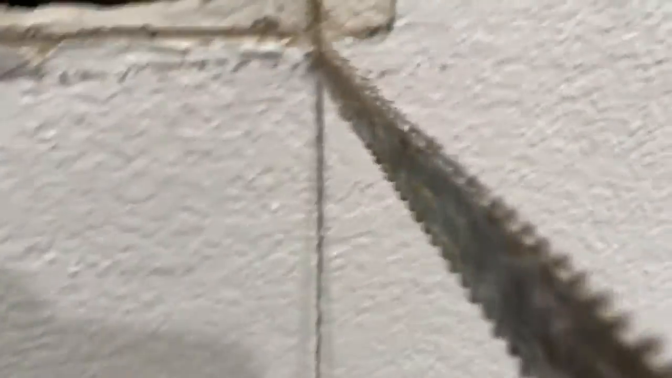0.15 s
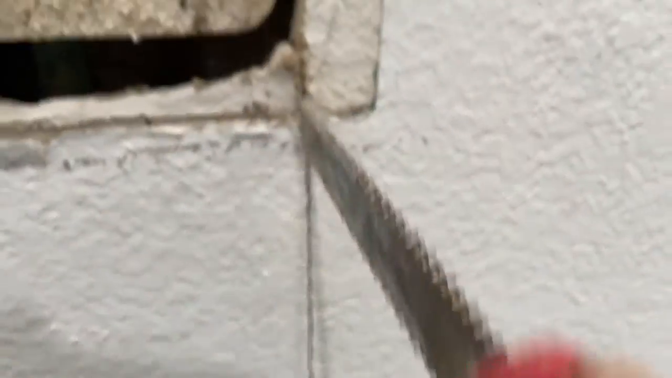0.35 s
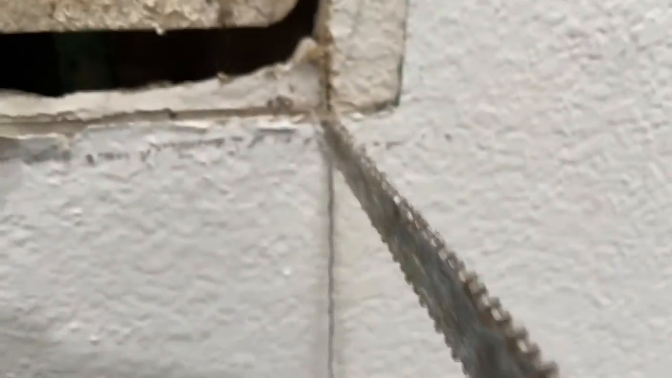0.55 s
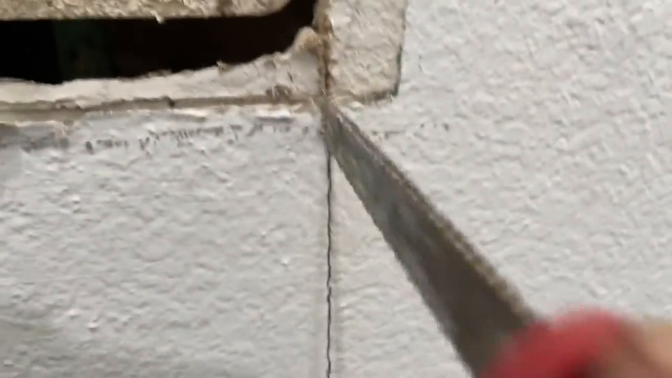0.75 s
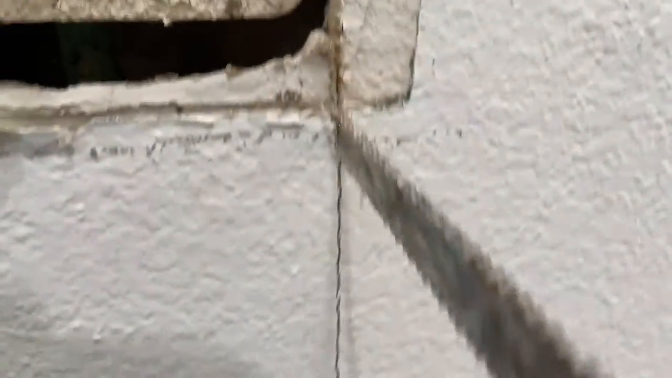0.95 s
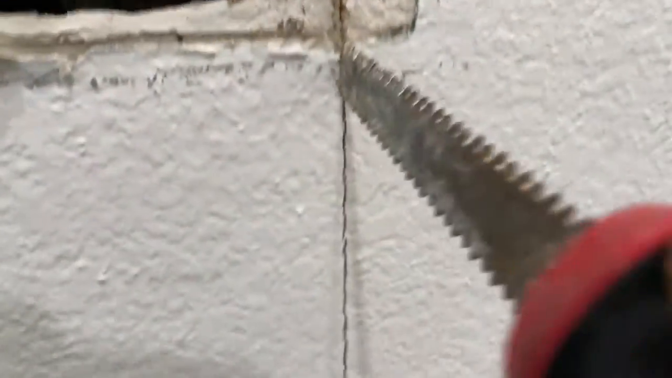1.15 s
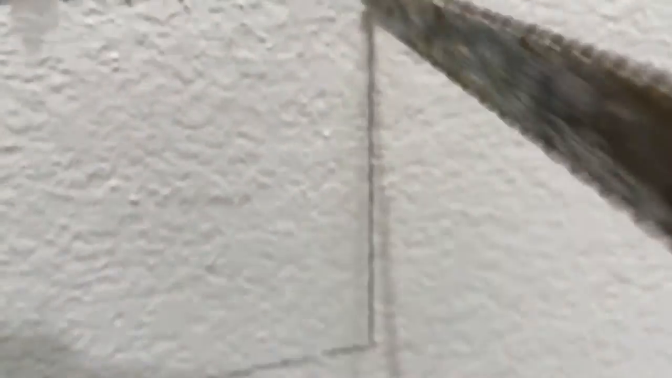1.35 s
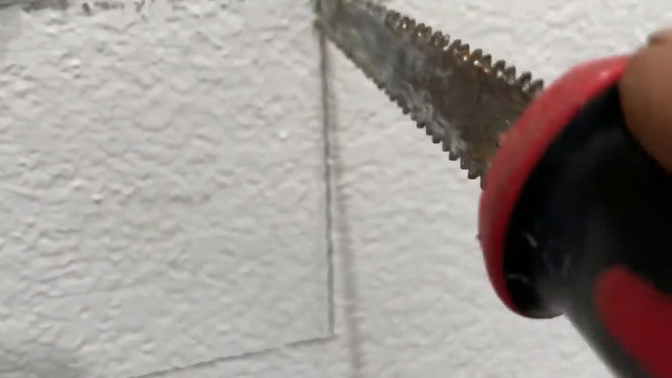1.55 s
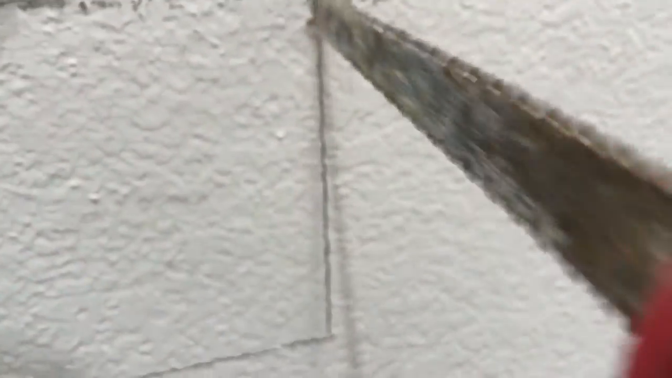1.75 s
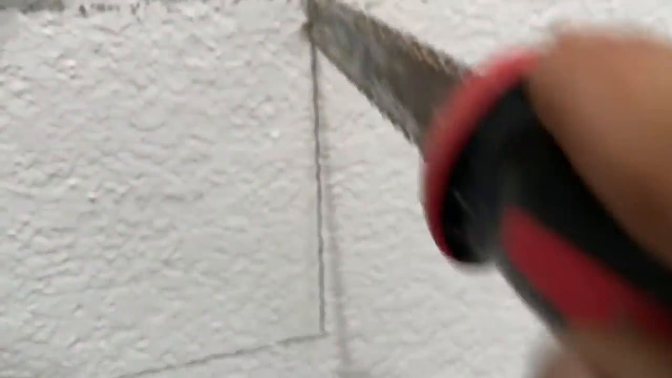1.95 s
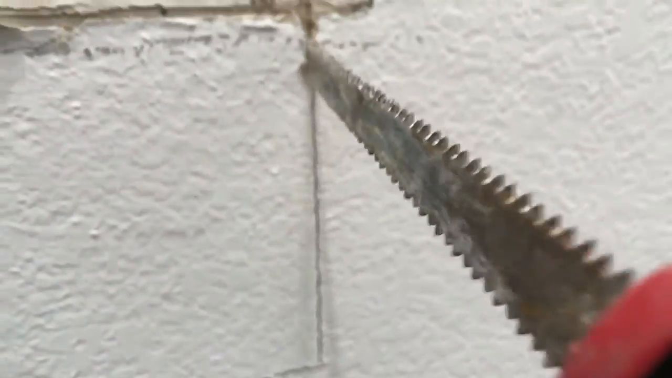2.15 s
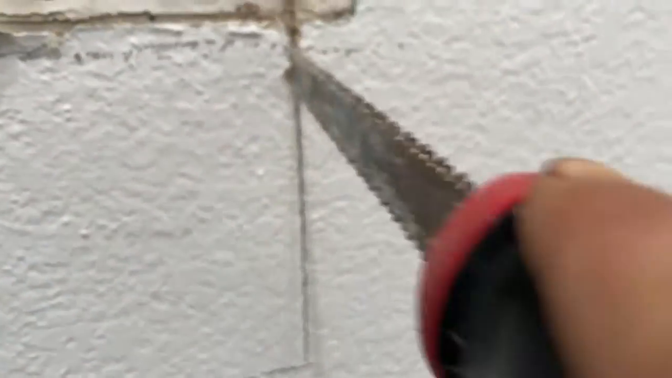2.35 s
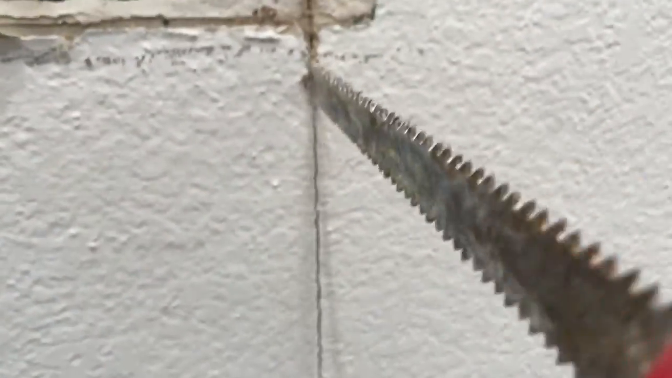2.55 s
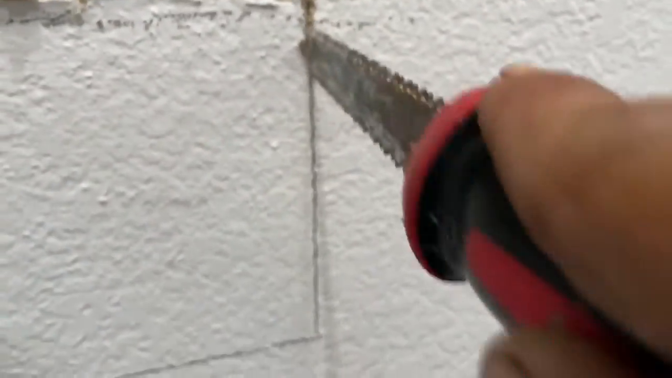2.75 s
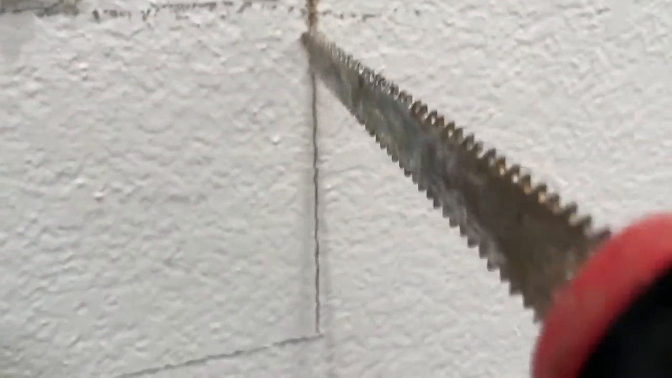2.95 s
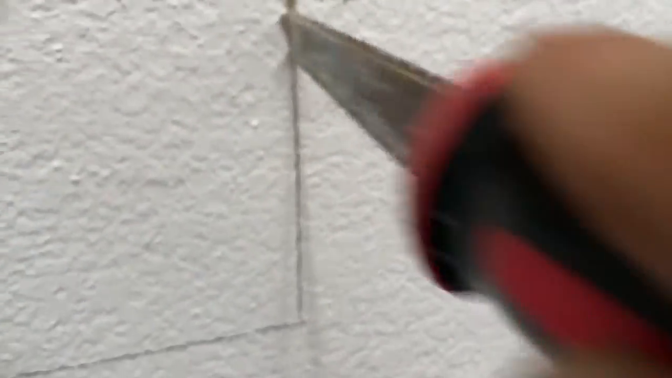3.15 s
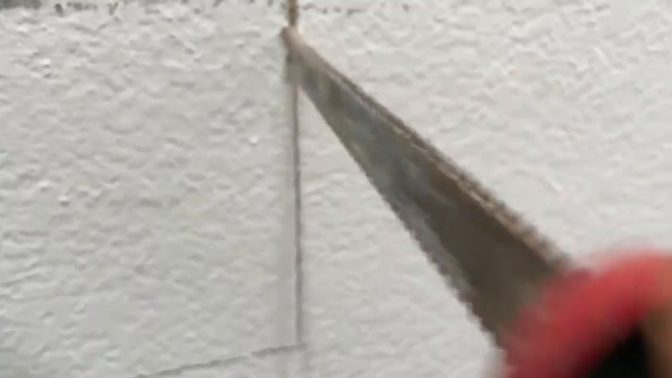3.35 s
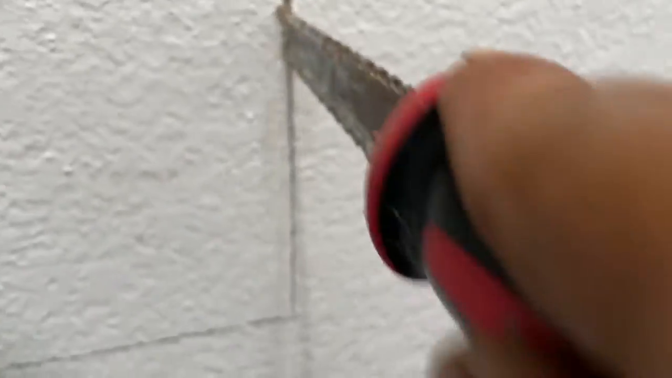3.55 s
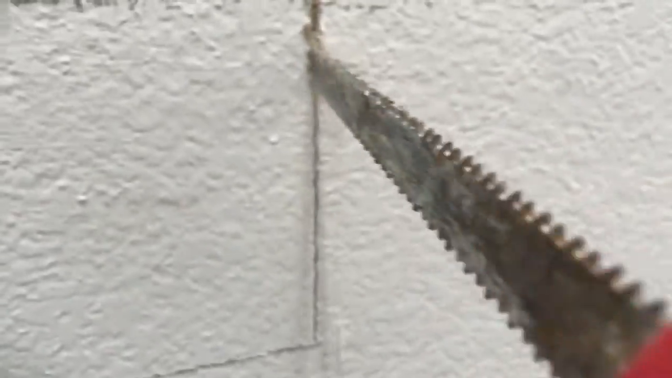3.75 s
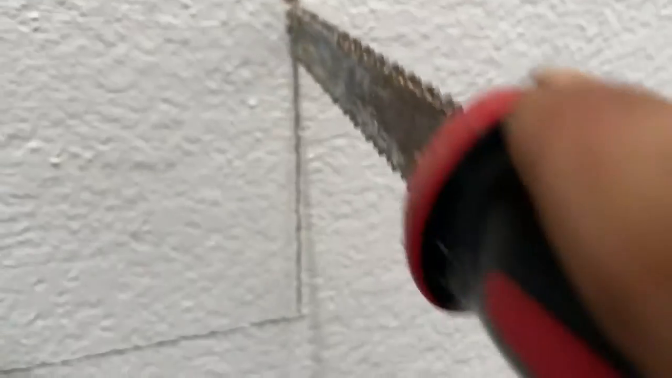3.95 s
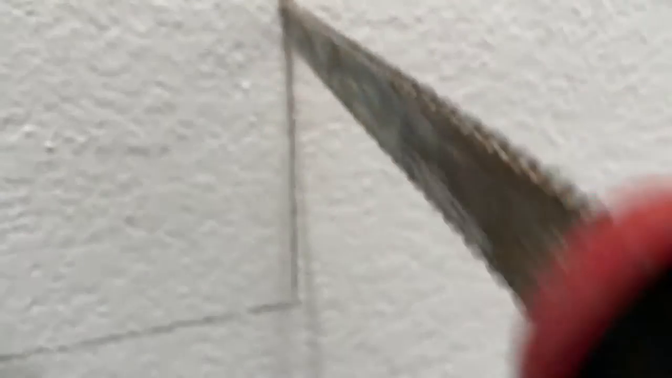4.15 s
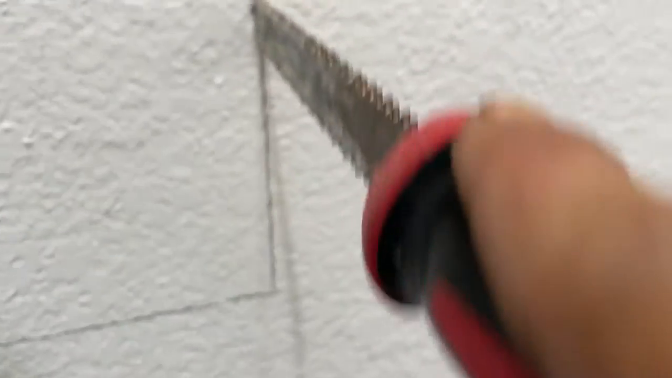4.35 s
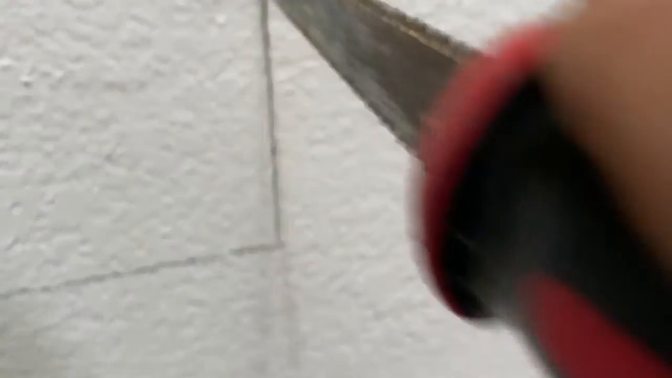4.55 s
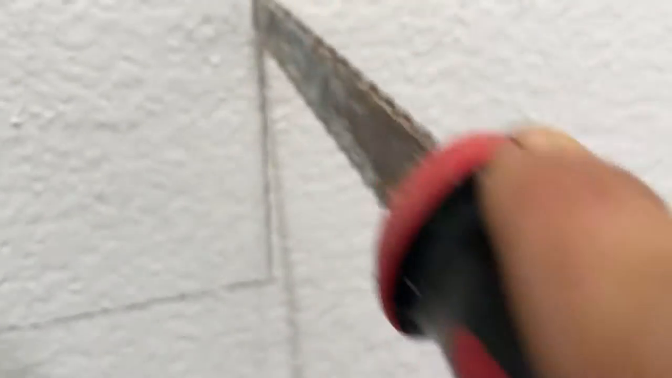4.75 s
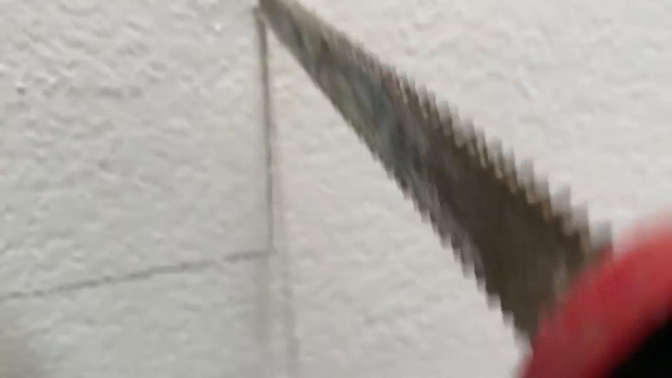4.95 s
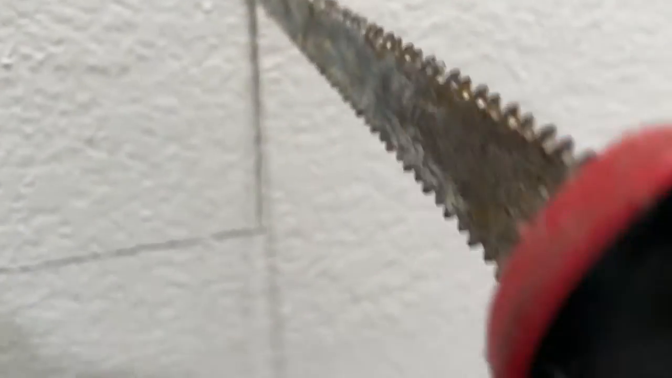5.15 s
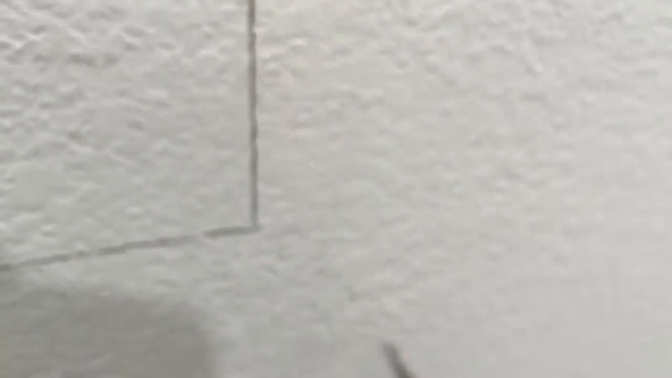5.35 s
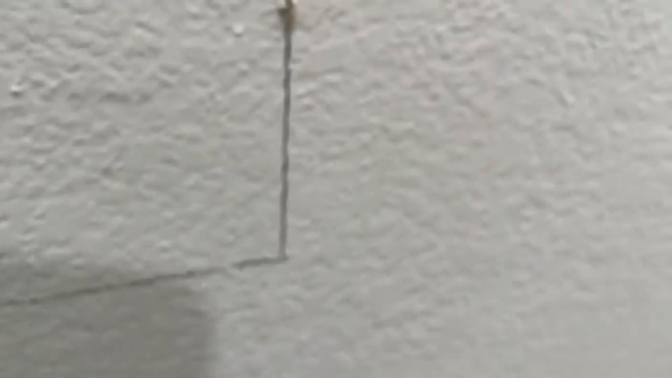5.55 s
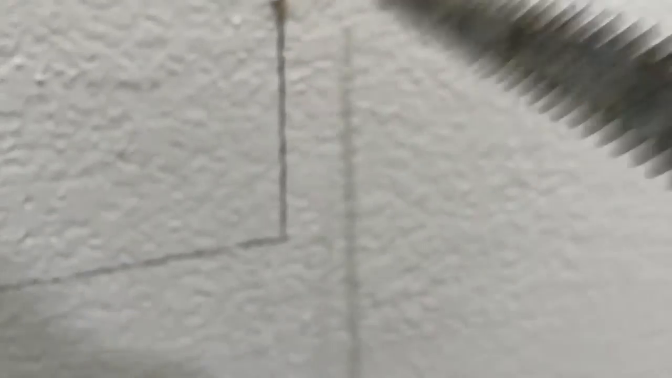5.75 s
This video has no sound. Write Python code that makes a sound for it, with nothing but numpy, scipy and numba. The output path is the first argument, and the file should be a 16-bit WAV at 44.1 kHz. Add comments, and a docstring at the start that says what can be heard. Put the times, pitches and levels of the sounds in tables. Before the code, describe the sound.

Close, fast sawing in a hollow wall panel: gritty rasps over a drumming low boom, ending in a short metallic ring and a hard thump.

```python
"""Hand saw in plasterboard

A narrow hand saw works back and forth through a hollow plasterboard wall, close to a phone, indoors.
Stick-slip chatter drives a low boom, random tooth bites ring board modes, filtered noise makes grit and dust.
Chips snap as noise bursts; the drawn-out blade rings briefly and knocks the wall as falling thumps and slaps.
Behind it lie filtered-noise room rumble, wavering hum partials and a momentary thin whine."""
import sys
import numpy as np
from scipy import signal
from scipy.fft import rfft, irfft
from scipy.io import wavfile
from scipy.ndimage import uniform_filter1d
from numba import njit

SR = 44100
rng = np.random.default_rng(int(sys.argv[2]) if len(sys.argv) > 2 else 0)


def generate_wav(sig):
    """Save sig (samples, or channels by samples) to the path in sys.argv[1] as 16-bit PCM at SR."""
    pcm = np.round(np.clip(np.atleast_2d(sig).T, -1, 1) * 32767).astype(np.int16)
    wavfile.write(sys.argv[1], SR, pcm)


N = 255780

# saw strokes, lags relative to the fastest moment: fastest_s, rise_s, fall_s, grit_gain_db, dust_gain_db,
# boom_gain_db, boom_lag_s, drum_gain_db, drum_lag_s, rasp_gain_db, rasp_lag_s,
# chatter_rising_hz, chatter_full_speed_hz, chatter_slowing_hz
STROKES = [(0.092, 0.046, 0.06, -47.5, -50.5, -27.5, 0.018, -46, -0.005, -32.5, -0.01, 104.5, 84, 80.5),
           (0.295, 0.1, 0.14, -27, -29.5, -12.5, 0.012, -19.5, -0.00075, -10.5, -0.0015, 91.9, 95, 95),
           (0.469, 0.137, 0.38, -40.5, -38.5, -18, 0.009, -25, -0.0012, -25.0, -0.016, 99.1, 86, 84.7),
           (0.569, 0.092, 0.077, -39.0, -42, -11.5, -0.022, -29.5, -0.007, -23.5, -0.014, 87, 82, 78),
           (0.727, 0.078, 0.16, -32.5, -32, -12.5, 0.027, -18.5, 0.012, -13, -0.0027, 99.15, 112, 93),
           (0.931, 0.13, 0.16, -37.0, -36.5, -10.5, 0.032, -27, 0.043, -19.5, 0.017, 79.9, 82, 72.5),
           (1.126, 0.11, 0.16, -32.5, -34.0, -10.0, -0.0049, -33, 0.01, -19.0, -0.011, 90.6, 84, 86),
           (1.328, 0.14, 0.2, -38.5, -36, -19, 0.0011, -16.5, 0.034, -21.5, 0.022, 85, 89, 93),
           (1.559, 0.18, 0.21, -39, -38.5, -17.5, 0.023, -32.0, 0.032, -24.0, 0.003, 86.16, 91, 105),
           (1.759, 0.099, 0.148, -37.5, -33.5, -13.0, 0.012, -23.5, 0.021, -20.5, -0.013, 91, 89, 85),
           (1.952, 0.14, 0.14, -33.5, -35.0, -13, 0.018, -25.0, 0.002, -12.5, -0.0033, 87.75, 104, 84.7),
           (2.115, 0.114, 0.2, -37, -34.0, -12.5, 0.01, -20, 0.021, -19, -0.007, 88.15, 97, 85),
           (2.267, 0.046, 0.075, -48.5, -53, -35.0, 0.041, -52.0, 0.027, -33, 0.003, 69, 77, 102),
           (2.351, 0.061, 0.062, -36, -37.5, -17.5, 0.028, -25, 0.0072, -20.5, -0.0074, 109.2, 87, 90),
           (2.435, 0.091, 0.075, -40.5, -45.5, -22.5, 0.028, -29.5, -0.011, -29, 0.0036, 107.8, 89, 85.6),
           (2.555, 0.11, 0.19, -39.5, -38.5, -14, 0.0033, -28.5, -0.001, -23, 0.0013, 98.95, 99, 85),
           (2.78, 0.12, 0.13, -30.5, -34.5, -11.5, 0.002, -23, 0.016, -14, -0.017, 92.96, 97.85, 102),
           (2.94, 0.11, 0.24, -36.5, -35.5, -12, 0.016, -28, 0.032, -19.5, 0.0035, 76.9, 87, 88.8),
           (3.188, 0.07, 0.17, -33, -36.5, -13, 0.026, -21, 0.005, -18.5, -0.0036, 85.9, 86, 93),
           (3.39, 0.16, 0.2598, -38.0, -37.5, -18, 0.033, -23, 0.011, -22, 0.006, 85, 91, 81.9),
           (3.58, 0.085, 0.15, -29, -31.5, -11, 0.0062, -16.5, 0.0025, -13, -0.006, 106.7, 103, 104),
           (3.758, 0.12, 0.188, -37, -33, -12, -0.0065, -18.0, 0.042, -16, 0.00013, 94.94, 88, 87),
           (3.93, 0.099, 0.14, -31, -32.5, -11.5, 0.0087, -17.5, 0.025, -12, 0.00095, 102, 107, 90),
           (4.115, 0.12, 0.19, -36.0, -33, -11, 0.015, -23, 0.015, -19.5, -0.0014, 93, 97.7, 92.2),
           (4.302, 0.11, 0.132, -31, -32.5, -9.5, 0.012, -30, -0.016, -14.5, -0.0018, 102.9, 116, 96),
           (4.499, 0.13, 0.14, -35.0, -32.5, -10.5, 0.008, -24, -0.0051, -14.5, 0.0047, 89, 105, 90.3),
           (4.684, 0.132, 0.14, -32, -33, -10.5, 0.018, -19.5, -0.00075, -16, -0.0037, 99, 104, 83),
           (4.921, 0.188, 0.17, -34.0, -33.5, -11.5, -0.0052, -26, -0.015, -19, -0.0051, 97, 103, 98),
           (5.343, 0.061, 0.084, -37.5, -34.0, -25, -0.018, -37.0, 0.038, -33, -0.0069, 105, 90, 83),
           (5.532, 0.012, 0.082, -48, -43.5, -27, -0.016, -35, -0.034, -26, -0.0064, 95, 93, 70)]
# upper board resonances: centre_hz, width_hz, gain_db
UPPER_MODES = [(880, 490, -13), (550, 370, -13), (731, 34, 2), (905.7, 28.3, 5), (1073, 13.5, -7),
               (1236, 14, -5), (1357, 6.5, -4.5), (1490, 13, -9.5), (2154, 10, -9.5), (2535, 23, -9.5),
               (3330, 9.3, -8.5)]


def undb(db):
    """Amplitude factor of a level in dB."""
    return 10 ** (np.asarray(db) / 20)


def unit(x):
    """Scale to an rms of 1."""
    return x / np.sqrt(np.mean(x ** 2))


def decay(t, t60_s):
    """Exponential fall by 60 dB in t60_s."""
    return np.exp(-np.log(1000) * t / t60_s)


def colour(x, points, turn_rad=0):
    """Filter by a (Hz, dB) outline; turn_rad is a phase shift per frequency bin."""
    hz, db = np.transpose(points)
    bins_hz = np.arange(N // 2 + 1) * SR / N + 1
    outline_db = np.interp(np.log(bins_hz), np.log(hz), db, -90, -90)
    return irfft(rfft(x) * undb(outline_db) * np.exp(1j * turn_rad), N)


@njit
def svf(x, hz, width_hz):
    """State-variable band-pass with a moving centre, gain 1 at the centre."""
    y, band, low = np.empty(len(x)), 0., 0.
    for i in range(len(x)):
        g, k = np.tan(np.pi * hz[i] / SR), width_hz / hz[i]
        v = (band + g * (x[i] - low)) / (1 + g * (g + k))
        band, low, y[i] = 2 * v - band, low + 2 * g * v, k * v
    return y


def walk(rate_hz):
    """Random levels held 1 / rate_hz s and slewed twice; spread 1."""
    hold = int(SR / rate_hz)
    steps = np.repeat(rng.standard_normal(N // hold + 1), hold)
    return unit(uniform_filter1d(uniform_filter1d(steps, hold), hold)[:N])


def resonate(x, modes, shift_db=0.):
    """Sum of resonances with alternating sign; each may swell and sink on its own."""
    out = np.zeros(N)
    for k, (hz, width_hz, db) in enumerate(modes):
        gain = undb(db + shift_db * walk(18))
        out += (-1) ** k * gain * svf(x, np.full(N, 1. * hz), 1. * width_hz)
    return out


def smooth_rms(x, span_s):
    """Running rms over span_s."""
    return np.sqrt(uniform_filter1d(x ** 2, int(span_s * SR)) + 1e-12)


def snaps(events, gain_db, fall_s):
    """Sudden rises that die away exponentially, with time constant fall_s."""
    out, t = np.zeros(N), np.arange(int(6 * fall_s * SR)) / SR
    for s, db in events:
        start = int(s * SR)
        out[start:start + len(t)] += undb(db + gain_db) * np.exp(-t / fall_s)
    return out


def room():
    """Quiet room rumble from filtered noise, and the wavering hum of an appliance from sines."""
    # rumble outline: hz, gain_db
    rumble_outline = [(24, -34), (40, -1), (122, -3.5), (284, -15), (478, -18), (1960, -29), (2390, -26.5),
                      (2580, -29), (8070, -41.5), (15000, -50)]
    # hum partials: pitch_hz, level_db (rms, before wavering), start_s, end_s
    hum_partials = [(59, -48, 0, 5.8), (118, -50, 0, 5.4), (937, -69, 0, 5.8), (1480, -67, 0, 2.4),
                    (4936, -78, 5.05, 5.8)]
    shared, left, right = rng.standard_normal((3, N))
    pair = [colour(shared + 1.8 * left, rumble_outline), colour(shared + 1.7 * right, rumble_outline)]
    air = unit(np.array(pair))
    t, hum = np.arange(N) / SR, np.zeros(N)
    for hz, db, start_s, end_s in hum_partials:
        gate = uniform_filter1d(1. * (t >= start_s) * (t <= end_s), SR // 20)
        level = np.sqrt(2) * undb(db + 2 * walk(7.4))
        hum += level * gate * np.sin(2 * np.pi * hz * t + 2.26 * walk(29))
    return undb(-47 + 0.5 * walk(15)) * air + hum


def whine():
    """A thin whine for a moment: a few upper partials of one steady pitch."""
    # partials: multiple, level_db (rms, before wavering)
    partials = [(5.0, -64), (6.0, -77), (7.0, -72), (9.0, -79)]
    base_hz, start_s, end_s = 464.3, 4.9, 5.42
    t, tone = np.arange(N) / SR, np.zeros(N)
    gate = uniform_filter1d(1. * (t >= start_s) * (t <= end_s), size=4000)
    for multiple, db in partials:
        level = np.sqrt(2) * undb(db + 2 * walk(12))
        tone += level * np.sin(2 * np.pi * multiple * base_hz * t + .5 * walk(20))
    return gate * tone


def echo(x, t60_s, db):
    """The walls around return a short tail of the mids, unrelated left and right."""
    t = np.arange(int(t60_s * SR)) / SR
    mids = signal.butter(1, [250, 3500], "bandpass", fs=SR)
    tail = signal.lfilter(*mids, rng.standard_normal((2, len(t)))) * decay(t, t60_s)
    tail = tail / np.sqrt(np.sum(tail ** 2, 1, keepdims=True))
    return undb(db) * signal.fftconvolve(x, tail, axes=1)[:, :N]


def knocks():
    """Bending waves arrive treble first, a falling thump; with it a broad slap that trails off."""
    # blade knocks on the wall: start_s, thump_gain_db, slap_gain_db, slap_hz
    hits = [(5.081, -62, -58, 9470), (5.105, -38.5, -47.5, 954), (5.321, -32, -34, 3082),
            (5.4515, 0, -17.5, 865), (5.533, -21, -35.5, 2050)]
    # wall modes: pitch_hz, gain_db, t60_s
    wall_modes = [(98, -6, 0.16), (203.3, -14.5, 0.22), (497, -12.5, 0.064), (1021, -27.5, 0.09)]
    out, t = np.zeros((2, N)), np.arange(int(.25 * SR)) / SR
    sweep_hz = 150 + 110 * np.exp(-t / 0.023) + 1000 * np.exp(-t / 0.00188)
    thump = np.sin(2 * np.pi * np.cumsum(sweep_hz) / SR) * decay(t, 0.13) * (1 - decay(t, 0.024))
    for hz, db, t60_s in wall_modes:
        thump = thump + undb(db) * np.sin(2 * np.pi * hz * t) * decay(t, t60_s)
    slap_fall = decay(t, 0.056) + 0.11 * decay(t, 0.51)
    for s, thump_db, slap_db, slap_hz in hits:
        noise = rng.standard_normal((2, len(t)))
        centre_hz = np.full(len(t), 1. * slap_hz)
        slap = np.array([unit(svf(side, centre_hz, .9 * slap_hz)) for side in noise])
        hit = undb(thump_db) * thump + undb(slap_db) * slap * slap_fall
        start = int(s * SR)
        out[:, start:start + len(t)] += hit * undb([[-1.5], [1.5]])
    return out


def blade():
    """The freed blade rings as its teeth skim the edge of the cut."""
    # blade resonances: centre_hz, width_hz, gain_db
    blade_modes = [(3330, 100, 8), (5223, 190, -3), (3080, 130, -18)]
    # blade sliding out: time_s, level_db
    slide = [(5.31, -67), (5.325, -46), (5.349, -29), (5.368, -52), (5.385, -70)]
    s, db = np.transpose(slide)
    gain = undb(np.interp(np.arange(N) / SR, s, db, -120, -120))
    return np.array([gain * unit(resonate(rng.standard_normal(N), blade_modes)) for _ in range(2)])


def follow(gain_db, lag_s, law):
    """Level in dB of one layer: each stroke swells to its fastest moment and dies with the speed."""
    up, down, drop_db, ring_s = law
    t, power = np.arange(N) / SR, np.zeros(N)
    for (s, rise, fall), db, lag in zip(np.array(STROKES)[:, :3], gain_db, lag_s):
        peak, rise, fall = s + lag, max(rise + lag, 1e-2), max(fall + ring_s - lag, 1e-2)
        part = slice(max(int((peak - rise) * SR), 0), int((peak + fall) * SR))
        effort = np.interp(t[part], [peak - rise, peak, peak + fall], [0, 1, 0])
        speed = np.sin(np.pi / 2 * effort) ** np.where(t[part] < peak, up, down)
        power[part] += (undb(db - drop_db * (1 - effort)) * speed) ** 2
    return 10 * np.log10(np.abs(uniform_filter1d(power, size=300)) + 1e-12)


def chatter():
    """Stick-slip rate in Hz: moves to its full-speed value, then to rest; the nearer stroke leads."""
    rest_hz, stage_s = 75.87, 0.036
    t, hz, weight = np.arange(N) / SR, np.full(N, 1e-9 * rest_hz), np.full(N, 1e-9)
    for row in STROKES:
        s, rise, fall = row[0] + row[6], row[1], row[2]  # timed with the boom
        stages = s + stage_s * np.arange(-1, 3)
        share = np.interp(t, [s - rise, s, s + fall], [0, 1, 0]) ** 4
        hz = hz + share * np.interp(t, stages, [*row[-3:], rest_hz])
        weight = weight + share
    return uniform_filter1d(hz / weight, size=300)


def drum():
    """The panel between the studs has one strong drum mode, kept going unevenly."""
    hz = 161.5 * (1 + 0.019 * walk(24.99))
    return np.sqrt(2) * np.sin(2 * np.pi * np.cumsum(hz) / SR) * undb(1.1 * walk(40))


def boom(phase, hz):
    """The board follows the chatter of the blade: a lumpy low tone with some rumble round it."""
    tone = np.sqrt(2) * (np.sin(phase) + 0.17 * np.sin(3 * phase + 3 * walk(7.1)))
    rumble = unit(svf(svf(rng.standard_normal(N), hz, 62.0), hz, 62.0))
    apart = unit(svf(rng.standard_normal(N), hz, 53.0))
    body = tone + undb(2.0) * rumble
    # slow swings evened out: the hand alone sets the loudness
    body = body / smooth_rms(body, 0.0488)
    return body + undb(-17.5) * apart * np.array([[1], [-1]])


def grit(phase, grit_db, dust_db):
    """Crushed gypsum hisses in clumps: diffuse from the board below, straight from the cut in the treble."""
    # chips that snap off: start_s, relative_db
    chips = [(0.2418, -37), (0.6834, -28), (2.3204, -27), (3.4129, -34.5), (3.5771, -14), (3.7686, -23),
             (4.1073, -39), (4.1308, -37), (4.2707, -28), (4.3036, -8), (4.663, -15)]
    # grit outlines, left and right: hz, gain_db
    left_outline = [(500, -26), (1000, 4), (1700, -0.5), (2500, 4), (3300, 1), (4500, -4.5), (6500, -9.5),
                    (8000, -24)]
    right_outline = [(500, 15.5), (1000, 4), (1400, 3), (1700, -2), (3000, 5), (4500, -1.5), (6500, -5),
                     (8000, -18.5)]
    # dust outline: hz, gain_db
    dust_outline = [(5000, -20), (7500, -10), (9000, -9), (10500, -5), (11200, -10), (12000, -5.5),
                    (14000, -6), (15500, -10)]
    in_step_hz, port_lag_s = 10850, 2.14e-4
    chip_level = snaps(chips, -21, 0.0047)
    burst = undb(grit_db + 1.6 * walk(150) + 1.2 * np.cos(phase)) + chip_level
    shared, left, right, fine, spray = rng.standard_normal((5, N))
    wide = np.array([colour(burst * (left + 0.38 * shared), left_outline),
                     colour(burst * (right + 0.51 * shared), right_outline)])
    ring = np.array([resonate(burst * (side + 0.5 * shared), UPPER_MODES) for side in (left, right)])
    # the far port hears the cut a little later, so the two cancel in bands
    turn_rad = np.pi * port_lag_s * (np.arange(N // 2 + 1) * SR / N - in_step_hz)
    # fine dust flies mostly in the fast middle of a stroke
    clumps_db = 1.5 * walk(200) + 1.4 * walk(50) + 1.4 * np.cos(phase)
    puff = undb(dust_db + clumps_db) + undb(1.0) * chip_level
    dust = np.array([colour(puff * (fine + 0.017 * spray), dust_outline, turn_rad),
                     colour(puff * (fine - 0.017 * spray), dust_outline, -turn_rad)])
    return undb(3) * wide + undb(4.5) * ring + undb(7) * dust


def teeth(phase):
    """Uneven random tooth bites with some noise, bunched once a chatter cycle."""
    struck = rng.random(N) < 900 / SR  # bites per second
    bites = struck * rng.standard_normal(N) * undb(3.7 * rng.exponential(size=N))
    return unit(unit(bites) + .5 * rng.standard_normal(N)) * undb(4.15 * np.cos(phase))


def upper_share_db():
    """Slow change of the upper modes' share as the cut moves down the board."""
    # share of the upper modes: time_s, relative_db
    share = [(0, 1), (1.501, -1), (2.5, 0.5), (3.7, 0.5), (5.4, 1)]
    s, db = np.transpose(share)
    return np.interp(np.arange(N) / SR, s, db)


def rasp(phase):
    """Bites ring the board; two ports hear low modes nearly alike, upper ones from different patches."""
    # lower board resonances: centre_hz, width_hz, gain_db
    low_modes = [(234.4, 15.8, 5.5), (303.7, 84.4, -3.5), (352.7, 41.7, 0.5), (396, 44.3, -3),
                 (489, 29.6, -4)]
    shared, left, right = (teeth(phase) for _ in range(3))
    # the moving blade drives now one mode, now another
    low = unit(resonate(shared, low_modes, shift_db=1.25))
    side = unit(resonate(left - right, low_modes))
    high = unit(np.array([undb(1.0) * resonate(left, UPPER_MODES),
                          undb(6.0) * resonate(right + 0.32 * left, UPPER_MODES)]))
    pair = np.array([undb(-2.0) * (low + 0.21 * side), undb(1.4) * (low - 0.24 * side)])
    pair = pair + undb(-13 + upper_share_db()) * high
    return pair / smooth_rms(low, 0.058)


def scene():
    """Strokes drive boom, drum, rasp and grit; blade ring and knocks join, with echo and background."""
    # how a layer follows blade speed: rising_power, falling_power, extra_drop_towards_rest_db, ring_on_s
    grit_law = (1.76, 3.15, 9.2, 0.00074)
    dust_law = (3, 7, 2.5, 0.01)
    boom_law = (5.55, 4.3, 0.24, 0.035)
    drum_law = (2.6, 6.4, 14.3, 0.075)
    rasp_law = (0.48, 6, 34.8, 0.096)
    # teeth that catch hard and jolt the board: start_s, relative_db
    catches = [(0.073, -28), (0.242, -11.5), (0.289, -6), (0.721, -6), (0.951, -12), (1.504, -14),
               (1.73, -16), (1.917, -9.5), (2.131, -13), (2.337, -14), (2.752, -4.5), (3.163, -17),
               (3.565, -8), (3.71, -18), (3.917, -6), (4.491, -8.5), (4.89, -14)]
    columns = np.array(STROKES).T[3:11]
    grit_gain, dust_gain, boom_gain, boom_lag, drum_gain, drum_lag, rasp_gain, rasp_lag = columns
    grit_db = follow(grit_gain, 0 * grit_gain, grit_law)
    dust_db = follow(dust_gain, 0 * dust_gain, dust_law)
    boom_db = follow(boom_gain, boom_lag, boom_law)
    drum_db = follow(drum_gain, drum_lag, drum_law)
    bite = undb(follow(rasp_gain, rasp_lag, rasp_law)) + snaps(catches, gain_db=-10.5, fall_s=0.012)
    hz = chatter()
    # the grip on the wall slips, so the chatter never holds its pitch
    phase = 2 * np.pi * np.cumsum(hz * (1 + 0.039 * walk(40))) / SR
    low = undb(boom_db) * boom(phase, hz) + undb(drum_db) * drum()
    saw = undb([[-.6], [.6]]) * low + bite * rasp(phase) + grit(phase, grit_db, dust_db)
    near = saw + blade() + knocks()
    return near + echo(near, t60_s=.3, db=-18.5) + room() + whine()


def record(dry):
    """The phone drops the deepest bass, rounds the loudest peaks and cuts the top."""
    bass_cut = signal.butter(2, 36, "highpass", fs=SR, output="sos")
    top_cut = signal.ellip(10, .2, 80, 15900, fs=SR, output="sos")
    dry = signal.sosfilt(bass_cut, dry)
    soft = dry / (1 + np.abs(dry / 1.05) ** 3) ** (1 / 3)
    return signal.sosfilt(top_cut, soft)


dry = scene()
out = record(dry)
generate_wav(out)
```